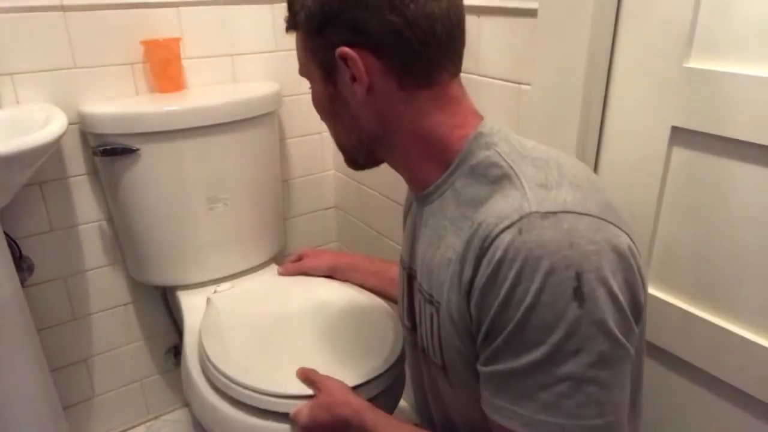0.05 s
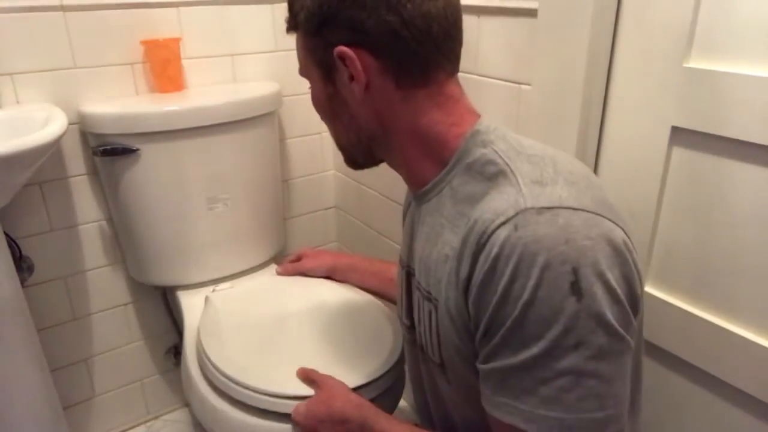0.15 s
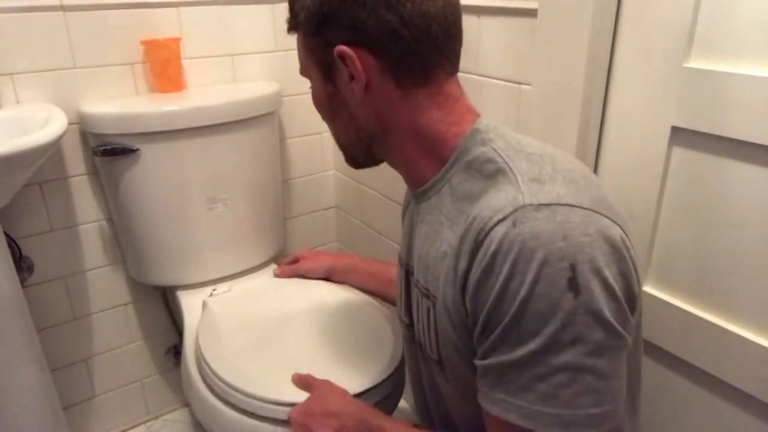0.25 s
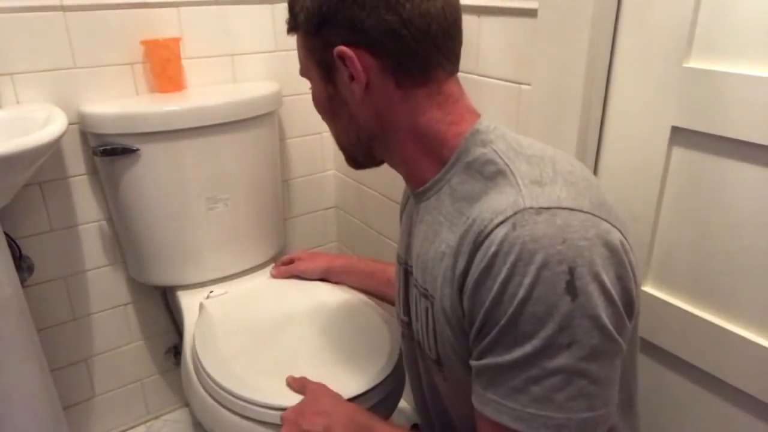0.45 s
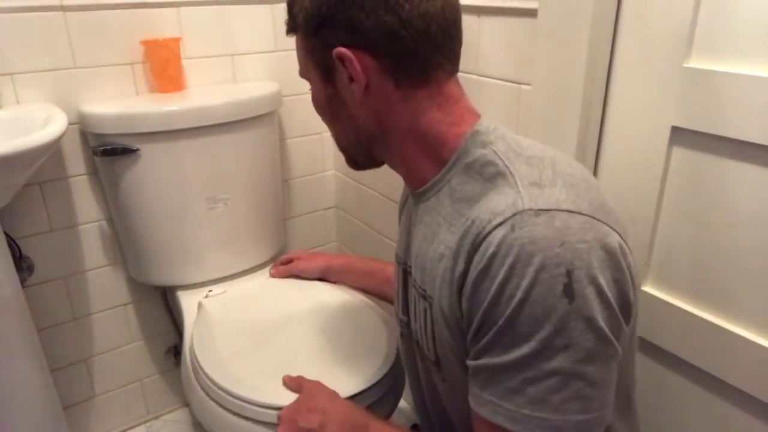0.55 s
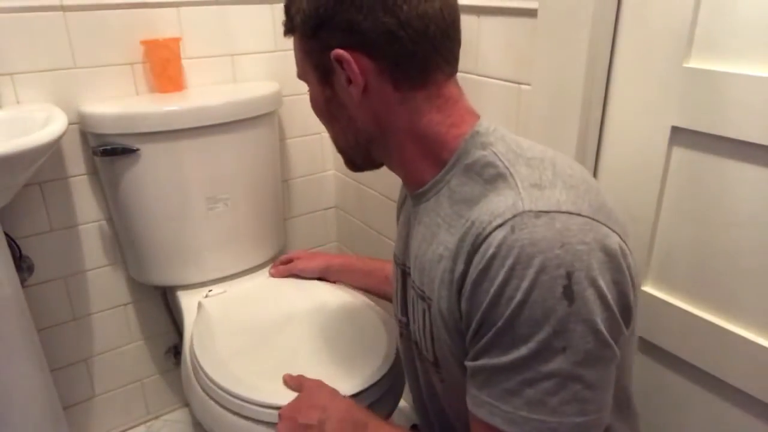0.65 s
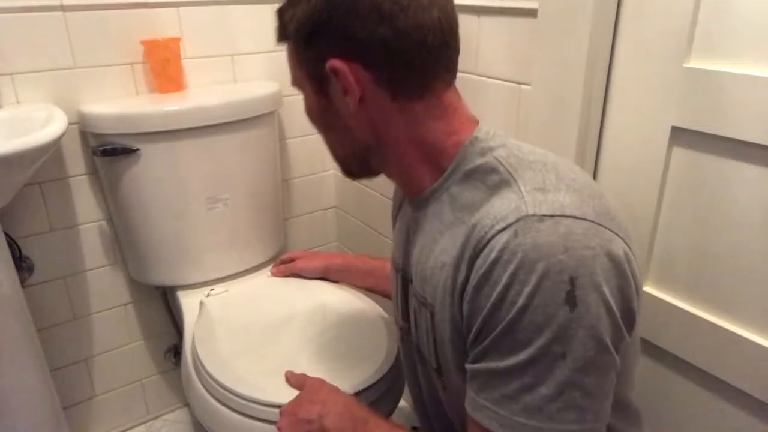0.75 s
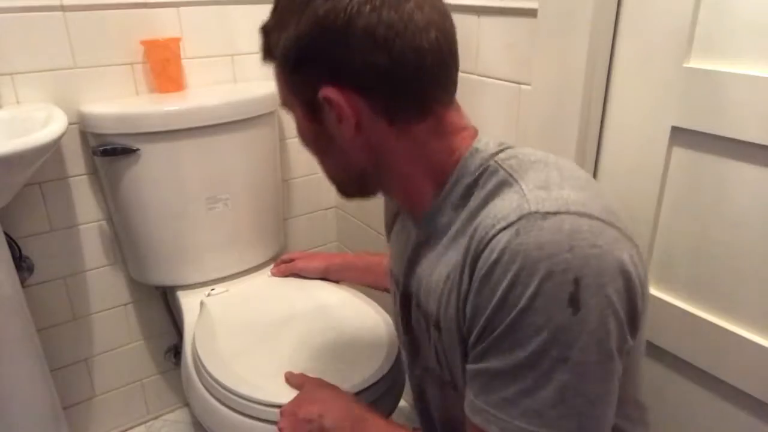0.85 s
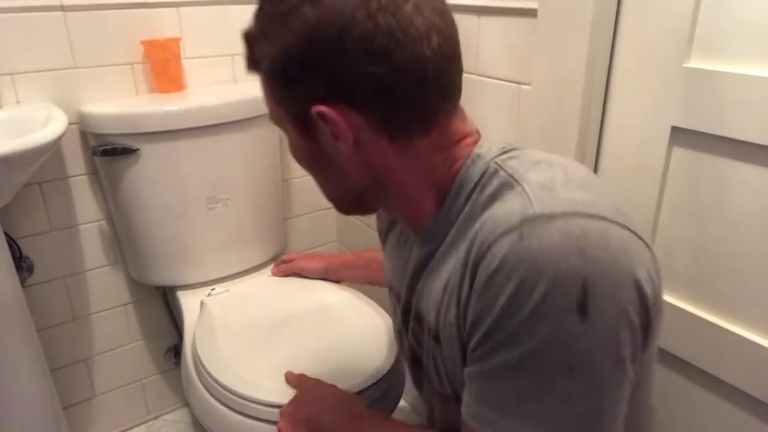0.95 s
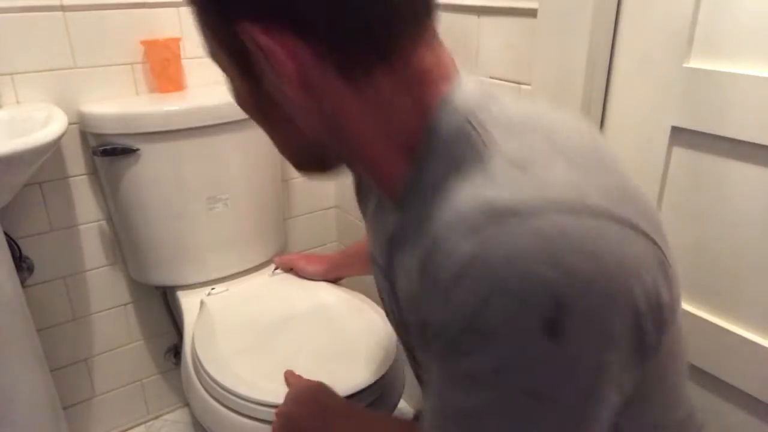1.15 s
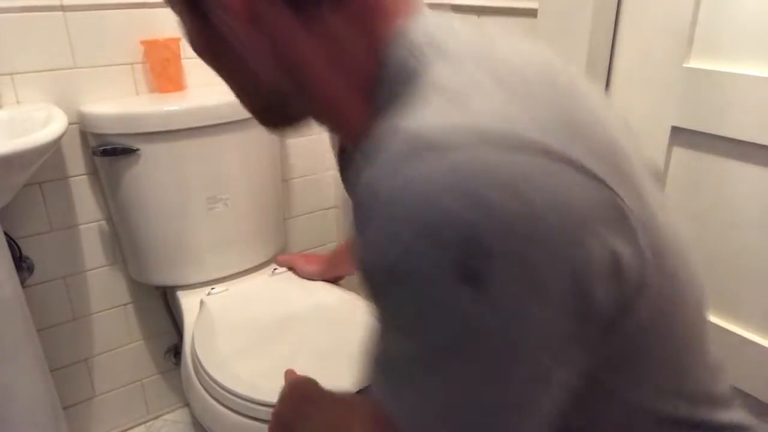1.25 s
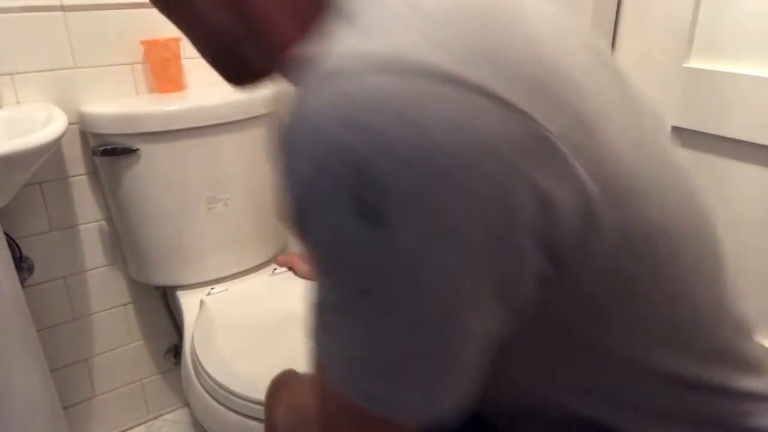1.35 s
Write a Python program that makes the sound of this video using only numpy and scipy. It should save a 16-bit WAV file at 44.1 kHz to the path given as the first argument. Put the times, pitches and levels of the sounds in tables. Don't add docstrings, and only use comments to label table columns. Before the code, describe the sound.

A toilet lid lands on its seat in a small tiled bathroom, heard close. Faint touches at 0-0.06 s; one edge knocks at 0.23 s, then a hard bright clack and chatter at 0.28-0.33 s, with hollow bowl ring and low boom, damped by a hand near 0.5 s. Soft bumps around 0.78 s and faint touches near 1.0 s follow. Quiet hum, hiss and regular faint ticking continue throughout.

```python
import sys
import numpy as np
from scipy import signal
from scipy.fft import rfft, irfft
from scipy.io import wavfile

SR = 44100
rng = np.random.default_rng(int(sys.argv[2]) if len(sys.argv) > 2 else 0)


def nominal_scale(level):
    x = np.asarray(level, float) / 20
    return 10 ** x


def log_audio(samples):
    frames = np.atleast_2d(samples).T
    limited = np.clip(frames, -1, 1)
    pcm = np.round(limited * 32767).astype(np.int16)
    wavfile.write(sys.argv[1], SR, pcm)


N = 61739

# (frequency [Hz], density [dB per Hz])
CRACK_COLOUR = [(250, -2.5), (700, -3), (1080, -9), (1530, -10), (1980, -9), (2900, -6.5), (3800, -21.5),
                (6500, -54)]
PRESS_S = 0.504


def evened(x):
    return x / np.sqrt(np.mean(x ** 2) + 1e-20)


def read(points, hz):
    f, value = np.transpose(points)
    return np.interp(np.log(hz + 1), np.log(f + 1), value)


def add(mix, s, sound):
    part = mix[max(round(s * SR), 0):][:len(sound)]
    part += sound[:len(part)]


def coloured(x, spectrum):
    gain = nominal_scale(read(spectrum, np.fft.rfftfreq(len(x), 1 / SR)))
    return evened(irfft(rfft(x) * gain, len(x)))


def fuzzy(hz, width_hz):
    r = np.exp(-np.pi * abs(width_hz) / SR)
    low = [1, 1j] @ rng.standard_normal((2, N + SR))
    for _ in range(2):
        low = signal.lfilter([1], [1, -r], low)
    low = low[SR:]
    return evened((low * np.exp(2j * np.pi * hz * np.arange(N) / SR)).real)


def room_air():
    # (frequency [Hz], density [dB per Hz])
    air_colour = [(20, -26.5), (60, -11), (119, -8), (150, -11), (600, -18.5), (1000, -21.5), (3300, -29.5),
                  (4800, -44)]
    # (frequency [Hz], width [Hz], level [dB])
    hum_tones = [(120.1, 12, -68), (49.6, 16, -72.5), (278.4, 24, -81.5)]
    # (time [s], level [dB])
    drone_levels = [(0, -68.5), (.1, -70.5), (.5, -77), (.62, -67), (.74, -72.5), (.9, -69), (.97, -82),
                    (1.02, -65.5), (1.17, -66), (1.25, -75), (1.4, -75)]
    air = nominal_scale(-65) * coloured(rng.standard_normal(N + 1), air_colour)[:N]
    hums = sum(nominal_scale(db) * fuzzy(hz, width_hz) for hz, width_hz, db in hum_tones)
    s, db = np.transpose(drone_levels)
    drone = nominal_scale(np.interp(np.arange(N) / SR, s, db) + 0.5) * fuzzy(hz=655, width_hz=70)
    return air + hums + drone


def ticks():
    start_s, every_s = 0.0530, 0.10243
    tick_hz, tick_db, spread_db, t60 = 3070, -58.5, 1.5, 0.009
    out, t = np.zeros(N), np.arange(1500) / SR
    for k, (size, pitch) in enumerate(rng.standard_normal((14, 2))):
        tick = np.sin(2 * np.pi * tick_hz * (1 + 0.02 * pitch) * t) * np.minimum(t / 0.00033, 1)
        add(out, start_s + k * every_s, tick * nominal_scale(tick_db + spread_db * size - 60 * t / t60))
    return out


def pressed(s, t):
    press_db_per_s = 303
    return nominal_scale(-press_db_per_s * np.maximum(s + t - PRESS_S, 0) * (s < PRESS_S))


def floor_booms():
    # (start [s], pitch [Hz], level [dB], rise [s], t60 [s])
    boom_events = [(.0, 55.2, -54, 0.017, 0.18), (.07, 51, -55, 0.02, 0.31), (0.231, 95, -39.5, 0.01, .1),
                   (0.264, 70.5, -40, 0.012, 0.11), (0.295, 81.9, -36, 0.021, 0.076),
                   (0.3234, 50.4, -34, 0.027, 0.64), (0.531, 53.6, -57.5, 0.018, 0.53),
                   (0.581, 50.8, -59.5, 0.048, 0.36), (0.629, 56, -52.5, 0.015, 0.12),
                   (0.699, 43.2, -60.5, .03, 0.32), (0.779, 77, -54.5, 0.027, 0.1),
                   (0.829, 70, -57, 0.011, 0.18), (0.878, 51.8, -56.5, 0.021, 0.16),
                   (1.29, 54.1, -59.5, .03, 0.36)]
    out, t = np.zeros(N), np.arange(SR) / SR
    for s, hz, db, rise, t60 in boom_events:
        swell = np.sin(np.pi / 2 * np.minimum(t / rise, 1)) ** 2 * pressed(s, t)
        level = nominal_scale(db - 60 * np.maximum(t - rise, 0) / t60)
        add(out, s, -swell * level * np.sin(2 * np.pi * hz * t))
    return out


def snaps():
    # (time [s], level [dB])
    snap_events = [
        (.0030, -45),
        (.2805, -22),
        (.2858, -26),
        (0.776, -53),
    ]
    # (frequency [Hz], level [dB], t60 [s])
    edge_modes = [(2000, -1.5, 0.016), (2926, -5, 0.019), (3340, -10, 0.019), (4074, -18.5, 0.011),
                  (5460, -43.5, 0.024)]
    out, t = np.zeros(N), np.arange(3000) / SR
    attack = np.sin(np.pi / 2 * np.minimum(t / 0.0011, 1)) ** 2
    modes = sum(nominal_scale(db - 60 * t / t60) * np.sin(2 * np.pi * hz * t) for hz, db, t60 in edge_modes)
    for s, db in snap_events:
        add(out, s, nominal_scale(db) * attack * modes)
    return out


def ring(modes, s, t):
    rise_s, spread_db = 0.0012, 5
    hz, db, t60 = np.transpose(modes)[:, :, None]
    level = db + spread_db * rng.standard_normal((len(modes), 1))
    lines = nominal_scale(level - 60 * t / t60) * np.sin(2 * np.pi * hz * (t + s))
    return lines.sum(0) * (1 - np.exp(-(t / rise_s) ** 2))


def tile_tail(noise):
    # (frequency [Hz], t60 [s])
    tile_decay = [(400, 0.4), (1500, 0.3), (3000, 0.23), (5000, 0.15)]
    hz, t, z = signal.stft(coloured(noise, CRACK_COLOUR), SR, nperseg=256)
    z = z * nominal_scale(-60 * t / read(tile_decay, hz)[:, None])
    return signal.istft(z, SR, nperseg=256)[1][:len(noise)]


def crack_sound(s, t, crack_db):
    # (frequency [Hz], level [dB], t60 [s])
    rim_modes = [(1368.5, -6, 0.17), (1707, -7.5, 0.09), (1800, -4.5, .15), (1888, -3.5, 0.08),
                 (2060, -8, 0.11), (2176, -6, 0.095), (2420, -2.5, 0.083), (2727, -6, 0.11),
                 (2767, -7.5, 0.1), (2922, -12, 0.18), (3104, -9.5, 0.13), (3560, -14.5, 0.11),
                 (4120, -22, 0.16)]
    burst_t60, tile_db, rim_db = 0.039, -7.5, -11
    dull_hz, dull_db_per_db = 3460, 3
    burst = coloured(rng.standard_normal(len(t)), CRACK_COLOUR) * nominal_scale(-60 * t / burst_t60)
    crack = burst + nominal_scale(tile_db) * tile_tail(rng.standard_normal(len(t)))
    crack = crack + nominal_scale(rim_db) * ring(rim_modes, s, t)
    octaves_over = np.log2(np.maximum(np.fft.rfftfreq(len(t), 1 / SR) / dull_hz, 1))
    dulling = nominal_scale(dull_db_per_db * (crack_db + 30) * octaves_over)
    return irfft(rfft(crack * np.minimum(t / 0.0018, 1)) * dulling, len(t))


def seat_thud(s, t):
    # (frequency [Hz], level [dB], t60 [s])
    seat_modes = [(131.85, -10.5, .08), (159.6, -9.5, .09), (180, -12, .25), (256.5, -0.5, 0.059),
                  (292.7, -9, 0.31), (313.4, 0, 0.064)]
    # (frequency [Hz], density [dB per Hz])
    thud_colour = [(50, -15), (80, -2.5), (160, 5.5), (310, 5.5), (420, -3.5), (900, -51)]
    rise_s, t60, noise_db = 0.005, 0.2, -4
    rumble = coloured(rng.standard_normal(len(t)), thud_colour)
    rumble = rumble * (1 - np.exp(-t / rise_s)) * nominal_scale(noise_db - 60 * t / t60)
    return ring(seat_modes, s, t) + rumble


def bowl_ring(s, t):
    # (frequency [Hz], level [dB], t60 [s])
    bowl_modes = [(400, -20, 0.23), (617.5, -5.5, 0.4), (633, -10, 0.24), (654.4, -5.5, 0.22),
                  (712.7, -1, 0.076), (785, -9.5, 0.11)]
    # (frequency [Hz], density [dB per Hz])
    hollow_colour = [(400, -25.5), (560, 3), (700, 8.5), (880, -2), (1150, -13.5), (1400, -47.5)]
    t60 = 0.2
    hollow = coloured(rng.standard_normal(len(t)), hollow_colour)
    return ring(bowl_modes, s, t) + hollow * np.minimum(t / 0.0064, 1) * nominal_scale(-60 * t / t60)


def lid():
    # (time [s], bowl ring [dB], lid ring [dB], crack [dB], thud [dB])
    lid_contacts = [(.0015, -50, -62, -50.5, -64), (.012, -49, -79, -68, -64), (.026, -50.5, -72, -73, -72),
                    (.057, -65, -73, -71, -57.5), (.2285, -48.5, -47, -44, -52),
                    (.2375, -41.5, -46.5, -46.5, -43.5), (.252, -57.5, -44, -57.5, -59),
                    (.2775, -40, -45, -32.5, -47.5), (.2805, -50.5, -41.5, -32.5, -41.5),
                    (.2850, -38, -43.5, -41, -36), (.2925, -46.5, -49.5, -40, -33),
                    (.3065, -45, -36, -51, -38.5), (0.3132, -50, -43.5, -49.5, -47),
                    (.3250, -41.5, -41.5, -60, -58), (0.394, -63, -54, -73, -57.5),
                    (.770, -76, -80, -83, -62), (.7765, -59, -76, -54, -70), (0.788, -70, -71, -72, -48),
                    (0.796, -59, -63.5, -66, -53.5), (.835, -73, -86, -87, -78), (.976, -69, -64, -67, -80),
                    (1.01, -64, -73, -65, -78), (1.05, -72, -76, -68, -82)]
    # (frequency [Hz], level [dB], t60 [s])
    lid_modes = [(969.8, -1, 0.18), (988, -10, .3), (1047, -8, 0.11), (1055, -5.5, 0.074),
                 (1093, -10.5, .15), (1134, -13, 0.18)]
    let_go_s, held_db_per_s = 0.2, 246
    top_hz = 5500
    out, t = np.zeros(N), np.arange(SR // 2) / SR
    for s, bowl_db, lid_db, crack_db, thud_db in lid_contacts:
        contact = nominal_scale(bowl_db) * bowl_ring(s, t)
        contact = contact + nominal_scale(lid_db) * ring(lid_modes, s, t)
        contact = contact + nominal_scale(crack_db) * crack_sound(s, t, crack_db)
        contact = contact + nominal_scale(thud_db) * seat_thud(s, t)
        held = nominal_scale(-held_db_per_s * t * (s < let_go_s or s > PRESS_S))
        add(out, s, held * pressed(s, t) * contact)
    return signal.sosfilt(signal.butter(4, top_hz, fs=SR, output="sos"), out)


def scene():
    return (room_air() + ticks() + floor_booms() + snaps() + lid())[None]


def band_limit(x):
    return signal.sosfilt(signal.butter(12, 15350, fs=SR, output="sos"), x)


def record(dry):
    # (frequency [Hz], density [dB per Hz])
    hiss_colour = [(1500, 2.5), (4900, 0.5), (6300, 0.5), (8000, -4.5), (9800, -10), (10500, -28),
                   (11300, -10), (15500, -24)]
    hiss = nominal_scale(-76) * coloured(rng.standard_normal(N + 1), hiss_colour)[:N]
    return band_limit(dry + hiss)


dry = scene()
out = record(dry)
log_audio(out)
```